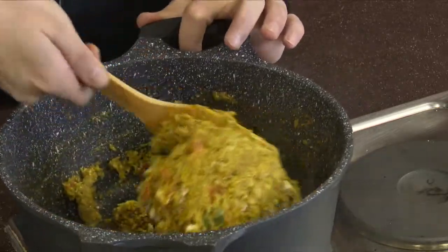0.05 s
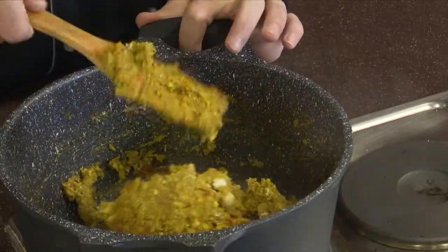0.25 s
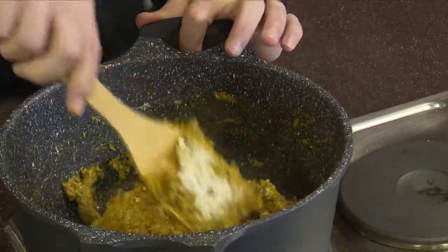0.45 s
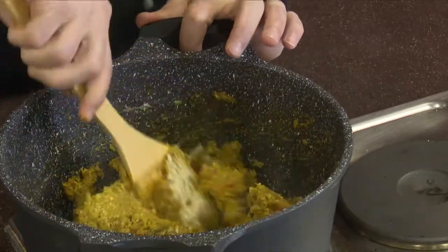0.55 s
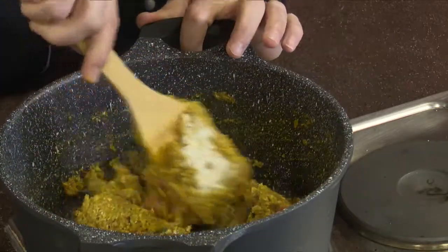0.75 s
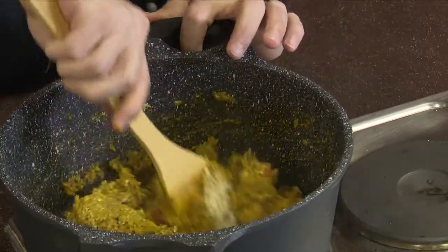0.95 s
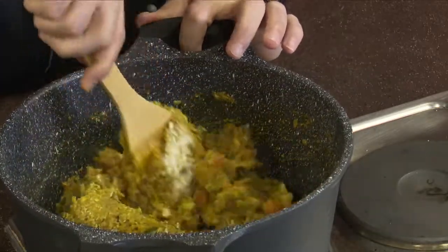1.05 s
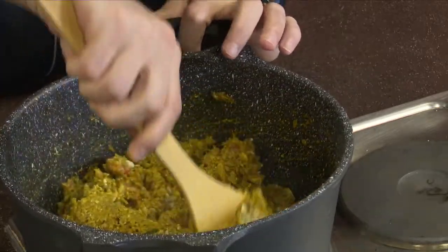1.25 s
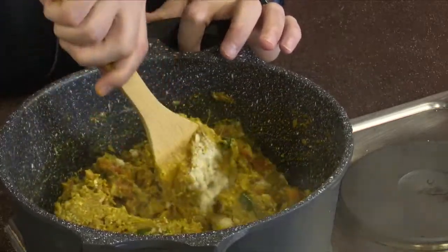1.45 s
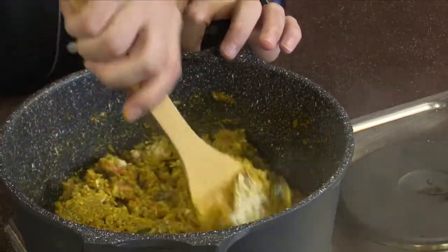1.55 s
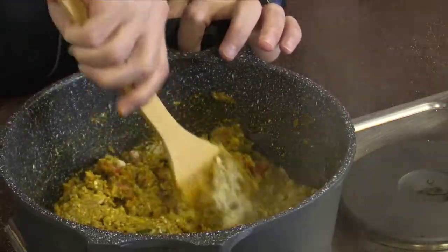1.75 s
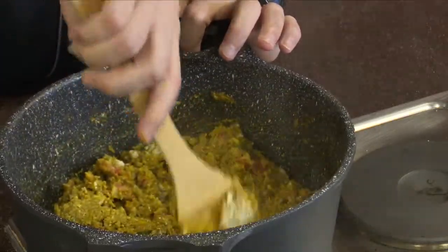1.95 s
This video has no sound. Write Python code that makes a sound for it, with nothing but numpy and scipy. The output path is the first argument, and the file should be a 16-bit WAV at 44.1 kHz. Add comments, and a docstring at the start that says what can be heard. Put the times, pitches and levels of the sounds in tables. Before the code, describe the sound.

A wooden spoon stirs thick paste in a coated metal pot, heard close in mono with a short kitchen tail. Over soft hush, a loud knock and scrape hits at 0.2 seconds, a dull tap at 0.36, and a brighter clatter with a thump at 0.5, then lighter scrapes until 0.85. Afterwards quiet stirring swells, with faint taps, wet ticks and squelches, low thumps at 1.4 and 1.74, and a last scrape at the end.

```python
"""A small kitchen, close mono microphone: a wooden spoon stirs thick paste in a coated metal pot.
The soft hush (shaped noise) is there throughout and swells as the paste is worked.
Soon the spoon chatters on the wall (noise through pot modes) and thumps the bottom (slowing sines, snaps).
Dull taps (decaying wood modes) come through the paste, followed later by small wet ticks (noise snaps)
and squelches (grainy noise) among more taps and thumps; a last scrape comes at the very end."""
import sys
import numpy as np
from scipy import signal
from scipy.fft import rfft, irfft
from scipy.io import wavfile
from scipy.ndimage import uniform_filter1d

SR = 44100
rng = np.random.default_rng(int(sys.argv[2]) if len(sys.argv) > 2 else 0)


def waveform_to_disk(signal):
    """Save audio, clipped to [-1, 1], as 16-bit WAV at the path in sys.argv[1]."""
    frames = np.transpose(np.atleast_2d(signal))
    scaled = np.clip(frames, -1, 1) * 32767
    samples = np.round(scaled).astype(np.int16)
    wavfile.write(sys.argv[1], SR, samples)


def boost(x):
    """Linear amplitude factor 10**(x/20) for a level x in decibels (scalar or array-like)."""
    u = np.asarray(x, float) / 20
    return 10 ** u


N = 88200  # samples, 2 s

# Kitchen hush spectrum. Each row: frequency in Hz, relative density in dB per Hz.
HUSH_SPECTRUM = [(15, -52), (25, -3), (70, -8.5), (141, 2), (301, -5), (384, 3.5), (416, 1), (887, -5.5),
                 (1330, -13.5), (4140, -22), (16000, -48)]
HUSH_DB = -56.5  # hush level before the stirring is added
# How much the paste is worked. Each row: time in seconds, gain on the hush in dB.
STIRRING = [(0, 5), (.1, 1.5), (.2, 0), (1.0, 5.5), (1.152, 2), (1.3, 3.5), (1.45, 6), (1.58, 1.5),
            (1.7, 7.5), (1.85, 1), (2, 0.5)]

# Spoon chattering on the pot wall. Each row: start in seconds, contact length in seconds, level in dB,
# tilt in dB per octave, weight of the bass in dB.
WALL_SCRAPES = [(0.197, 0.0067, -24, -1, 18), (0.206, 0.019, -25.5, 3, 5.5), (0.249, 0.037, -36.5, 0, 12),
                (0.365, 0.015, -36, -3.5, -1), (0.501, 0.0096, -22, 0, 7.5), (0.513, .026, -25.5, -4, -12),
                (.538, 0.00533, -20.5, 1.5, 2), (0.543, 0.025, -38.5, 7.5, -4), (0.587, 0.016, -47, -7, 9),
                (0.63, 0.013, -32, -2, -2), (.641, 0.013, -30, 1.5, -2.5), (0.654, 0.0076, -35, 4.5, -3),
                (.67, 0.042, -39.5, -4.5, -13), (0.768, 0.0063, -34.5, 1.5, 2),
                (.778, 0.0035, -30.5, -2.5, -1.5), (.793, 0.017, -32, 5.5, -6), (0.822, 0.026, -38, 3, -8),
                (1.990, 0.0104, -34.5, -1.5, 14)]
# Pot modes. Each row: frequency in Hz, width under the spoon in Hz, level in dB,
# share that rings freely in dB.
POT_MODES = [(324, 104, -11, -41), (434, 40, -3.5, -12), (517.5, 44, -4, -14.5), (592.6, 51, 3.5, -22.5),
             (687, 71, -0.5, -17.5), (844, 50, 1, -17), (931, 73, -0.5, -13.5), (1028, 67.6, 1, -7.5),
             (1186, 93.5, -6.5, -8), (1467, 159, -9, -16), (1702, 92, -8, -12), (1860, 106, -5, -7),
             (2160, 175, -9, -32), (2267, 120, -11.5, -7), (2500, 186, -7, -10), (3297, 140, -15.5, -2),
             (3513, 77, -12.5, -1), (3830, 193, -10.5, -15.5), (4428, 128, -13.5, -5.5),
             (4840, 400, -13, -22), (5500, 48, -18, -3), (5780, 226, -16.5, -9), (6170, 197, -23.5, -3.5),
             (6620, 250, -24.5, -17.5), (7320, 290, -28, -11), (7980, 240, -27.5, -9),
             (8765, 100, -27.5, -9), (9090, 140, -28, -10.5), (10500, 160, -30.5, -12),
             (10844, 120, -28.5, -12), (11400, 94, -27.5, -5), (11400, 130, -32, -6),
             (12200, 250, -40, -12), (12800, 130, -38, -3), (14600, 210, -40, -10), (15500, 140, -42, -10)]
RING_T60_S, RING_FALL = 0.33, 0.36  # free ring at 1 kHz; power law of its fall with pitch
BODY_DB, BODY_HZ = -13, 1770  # response between the modes, its upper corner
BASS_HZ = 706  # top of the bass
SPOT_DB = 2  # scatter of the modes from spot to spot
ATTACK_S, RELEASE_S = 0.00092, 0.0027  # of each contact
FADE_DB = 4  # pressure eases by this much during a contact
DRAG_DB, DRAG_S = -15.5, 0.022  # faint rub, dying away after each contact
CHATTER_DB = 2.5  # unsteadiness of the force
SPLIT, TWIN_DB = 0.392, 4  # ring partials: spread in mode widths and drop in dB, both per unit of offset

# Spoon edge or bursting paste pocket thumping the bottom. Each row: start in seconds,
# level before decay in dB, push time scale in seconds, crack peak in dB, crack frequency in Hz.
BOTTOM_THUMPS = [(.2045, -13.5, 0.00183, -14.5, 1960), (0.5062, -9, 0.001, -14.5, 1850),
                 (1.4199, -19, 0.00063, -25, 2960), (1.741, -13.5, 0.00078, -24, 2500)]
# Taps muffled by the paste. Each row: start in seconds, peak in dB, pitch scale as a ratio.
DULL_TAPS = [(.3595, -15, 0.93), (0.37, -48, 1.14), (0.971, -41, 0.58), (1.351, -40, 0.66),
             (1.467, -35.5, .45), (1.508, -40.5, 0.46), (1.605, -32, .6), (1.689, -35.5, 0.72)]
# Wood modes of the unloaded spoon. Each row: frequency in Hz, level in dB, T60 in seconds.
SPOON_MODES = [(547, -4, 0.034), (840, 3.5, 0.025), (1072, -11.5, 0.068), (1280, -5, 0.034)]
# Tiny wet ticks. Each row: start in seconds, peak in dB, frequency in Hz.
WET_TICKS = [(1.075, -51, 7000), (1.233, -44, 3900), (1.242, -50, 8000), (1.415, -41, 4000),
             (1.465, -38.5, 4200), (1.68, -65, 3160)]
# Paste squelching off the wall. Each row: start in seconds, length in seconds, level in dB.
SQUELCHES = [(1.407, 0.034, -52.5), (1.465, 0.027, -55), (1.6, 0.062, -57), (1.75, 0.069, -53.5)]
# Squelch spectrum. Each row: frequency in Hz, relative density in dB per Hz.
WET_SPECTRUM = [(200, 6.5), (450, -19), (1200, -7), (3000, -7.5), (6000, -16), (11000, -25), (16000, -27)]

ROOM_T60_S, ROOM_DB, ROOM_TOP_HZ = 0.64, -12.5, 5360
MIC_LOW_HZ, MIC_TOP_HZ = 55, 15650


def colour(x, points):
    """Shape x by (Hz, dB) points on a log axis; rms 1."""
    hz, db = np.array(points).T
    f = np.fft.rfftfreq(len(x), 1 / SR)
    gain = boost(np.interp(np.log(f + 1), np.log(hz), db))
    y = irfft(rfft(x) * gain, len(x))
    return y / np.std(y)


def walk(rate, size):
    """Random levels, a new one every 1 / rate s, joined by slopes; spread near 1."""
    k = int(SR / rate)
    held = np.repeat(rng.standard_normal(size // k + 1), k)
    return 1.2 * uniform_filter1d(held, k)[:size]


def hush():
    """Kitchen hush and soft paste noise; bass and treble flutter separately."""
    noise = colour(rng.standard_normal(N), HUSH_SPECTRUM)
    low = signal.sosfilt(signal.butter(2, 1200, fs=SR, output="sos"), noise)
    high = noise - low
    flutter = low * boost(1.5 * walk(39.4, N)) + high * boost(0.95 * walk(60.47, N))
    seconds, stir_db = np.array(STIRRING).T
    return flutter * boost(HUSH_DB + np.interp(np.arange(N) / SR, seconds, stir_db))


def add(out, s, x):
    """Mix x in at s seconds."""
    i = int(s * SR)
    out[i:i + len(x)] += x[:len(out) - i]


def gate(t, length, attack, release):
    """Attack, hold, exponential release."""
    return np.clip(t / attack, 0, 1) * np.exp(-np.clip(t - length, 0, None) / release)


def resonance(f, hz, width):
    """Complex response of a damped mode, rolled off above twice its frequency."""
    band = 1j * f * width
    return band / (hz ** 2 - f ** 2 + band) / (1 + 1j * f / (2 * hz)) ** 2


def pot():
    """Each chattering contact drives damped and freely ringing modes, weighted anew by the spot it touches."""
    out, size = np.zeros(N), 2 ** 15
    t, f = np.arange(size) / SR, np.fft.rfftfreq(size, 1 / SR) + 1
    hz, width, db, ring_db = (column[:, None] for column in np.array(POT_MODES).T)
    ring_t60 = RING_T60_S * (hz / 1000) ** -RING_FALL
    thin = np.log(1000) / np.pi / ring_t60  # bandwidth of a free ring
    # each free ring is a family of close partials
    family = 0
    for k in (-1.306, -0.563, -0.0052, 0.437, 1.095):
        family = family + resonance(f, hz + k * SPLIT * width, thin) * boost(-TWIN_DB * abs(k))
    ringing = boost(ring_db) * family * np.sqrt(width / thin)
    modes = boost(db) * (resonance(f, hz, width) + ringing)
    flips = (-1) ** np.arange(len(POT_MODES))  # neighbouring modes in opposite phase
    between = boost(BODY_DB) * 1j * f / (180 + 1j * f) / (1 + 1j * f / BODY_HZ) ** 3.6
    for s, length, level_db, tilt_db, bass_db in WALL_SCRAPES:
        chatter = rng.standard_normal(size) * boost(CHATTER_DB * walk(498, size))
        press = gate(t, length, ATTACK_S, RELEASE_S) * boost(-FADE_DB * np.minimum(t / length, 1))
        drag = boost(DRAG_DB) * gate(t, length, ATTACK_S, DRAG_S)
        force = chatter * (press + drag)
        spot = boost(SPOT_DB * rng.standard_normal(len(POT_MODES)))
        body = (flips * spot) @ modes + between
        touch_db = tilt_db * np.log2((f + 500) / 2000) + bass_db / (1 + (f / BASS_HZ) ** 4)
        y = irfft(rfft(force) * body * boost(touch_db), size)
        contact_rms = np.std(y[:int((length + RELEASE_S) * SR)])
        add(out, s, y[:size // 2] * boost(level_db) / contact_rms)
    return out


def crack(hz, t60, peak_db):
    """A short noise snap around hz."""
    t = np.arange(2048) / SR
    burst = rng.standard_normal(len(t)) * t * 1000 ** (-t / t60)
    y = signal.lfilter(*signal.iirpeak(min(hz, 15000), 1.6, SR), burst)
    y = signal.lfilter(*signal.butter(1, min(2 * hz, 15000), fs=SR), y)
    return y * boost(peak_db) / abs(y).max()


def thumps():
    """A pull and a slower rebound, a sine that slows as it decays, with a snap at the start."""
    out, t = np.zeros(N), np.arange(4096) / SR
    for s, db, push, crack_db, hz in BOTTOM_THUMPS:
        swing = np.pi * 3.0 * np.log1p(t / push / 3.64)  # phase in radians
        decay = np.exp(-(t / (1.6 * push)) ** 0.9)
        add(out, s, -boost(db) * np.sin(swing) * decay)
        add(out, s - .001, crack(hz, 0.0092, crack_db))
    return out


def taps():
    """Wood modes struck softly; the pitch scale, lower where paste loads the spoon, also slows the decay."""
    out, t = np.zeros(N), np.arange(8192) / SR
    for s, db, scale in DULL_TAPS:
        phases = rng.uniform(0, 0.86, len(SPOON_MODES))
        y = np.zeros(len(t))
        for (hz, mode_db, t60), phase in zip(SPOON_MODES, phases):
            tone = np.sin(2 * np.pi * hz * scale * t + phase)
            y += boost(mode_db) * tone * 1000 ** (-t * scale / t60)
        y = y * np.clip(t / 0.0022, 0, 1)  # soft onset, 2.2 ms
        add(out, s, y * boost(db) / abs(y).max())
    return out


def paste():
    """Wet ticks as tiny noise snaps, squelches as grainy noise with a level that wavers fast."""
    out, t = np.zeros(N), np.arange(16384) / SR
    for s, db, hz in WET_TICKS:
        add(out, s, crack(hz, 0.0016, db))
    for s, length, db in SQUELCHES:
        grain = rng.standard_normal(len(t)) * boost(1.7 * walk(400, len(t)))
        add(out, s, boost(db) * colour(grain, WET_SPECTRUM) * gate(t, length, 0.0013, 0.024))
    return out


def kitchen(sent):
    """Reverberant tail of the small kitchen: the sound convolved with softened, decaying noise."""
    t = np.arange(SR) / SR
    soft = signal.lfilter(*signal.butter(1, ROOM_TOP_HZ, fs=SR), rng.standard_normal(SR))
    tail = soft * 1000 ** (-t / ROOM_T60_S) * np.clip(t / 0.002, 0, 1)
    return boost(ROOM_DB) * signal.fftconvolve(sent, tail / np.sqrt(np.sum(tail ** 2)))[:N]


def scene():
    """Near sounds, their kitchen tail and the hush; the thumps feed the room less."""
    near = pot() + taps() + paste()
    close = thumps()
    room = kitchen(near + boost(-9.5) * close)
    return (near + close + room + hush())[None]


def top_cut(x):
    """Nothing passes above the cut-off."""
    return signal.sosfilt(signal.butter(12, 16450, fs=SR, output="sos"), x)


def record(dry):
    """The close mono microphone trims both ends of the spectrum."""
    x = signal.sosfilt(signal.butter(2, MIC_LOW_HZ, "high", fs=SR, output="sos"), dry)
    x = signal.sosfilt(signal.ellip(8, .3, 60, MIC_TOP_HZ, fs=SR, output="sos"), x)
    return top_cut(x)


dry = scene()
out = record(dry)
waveform_to_disk(out)
```